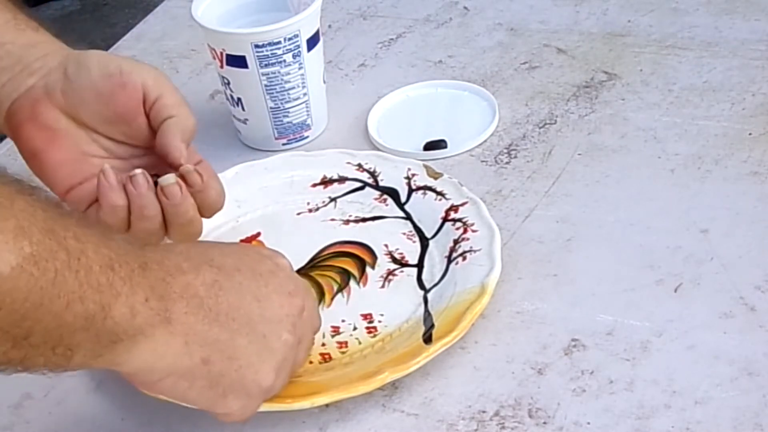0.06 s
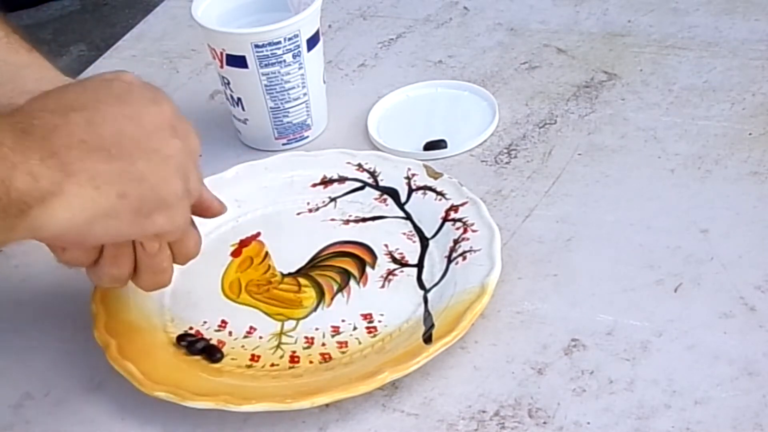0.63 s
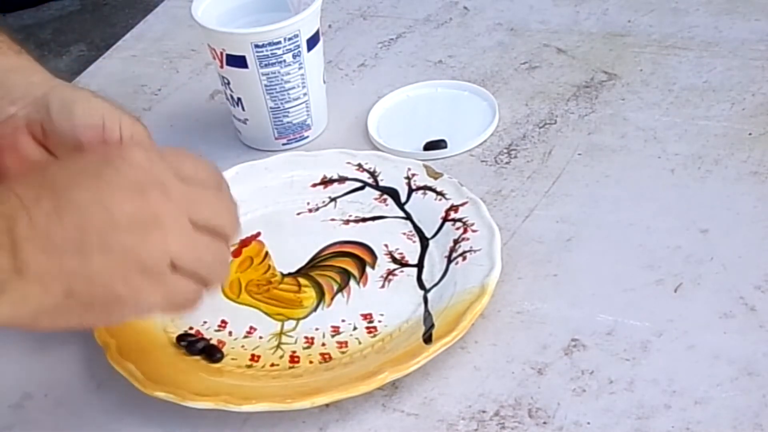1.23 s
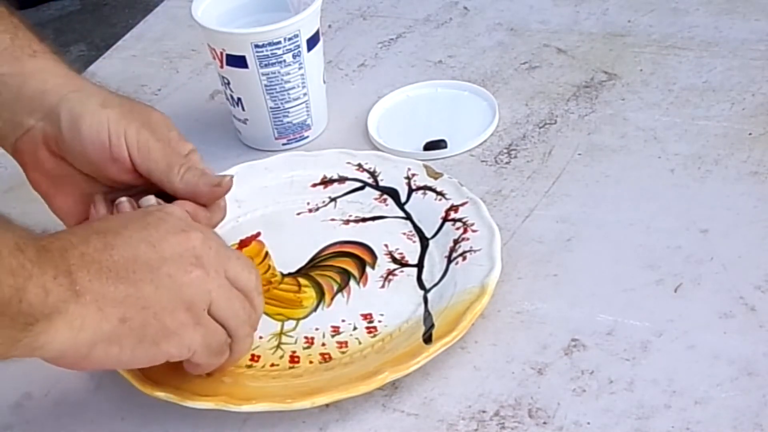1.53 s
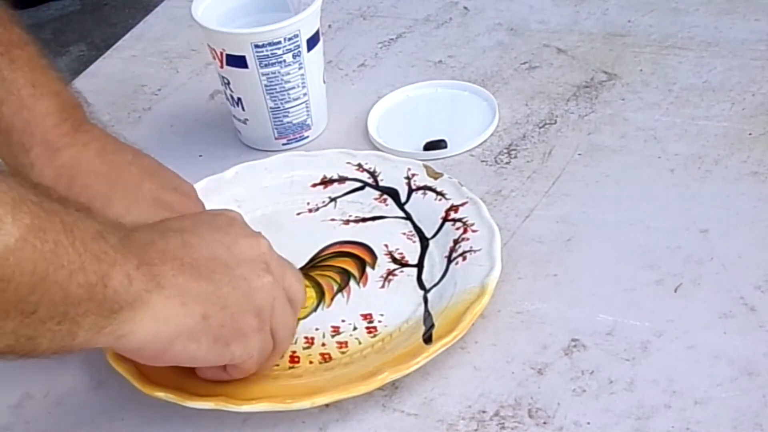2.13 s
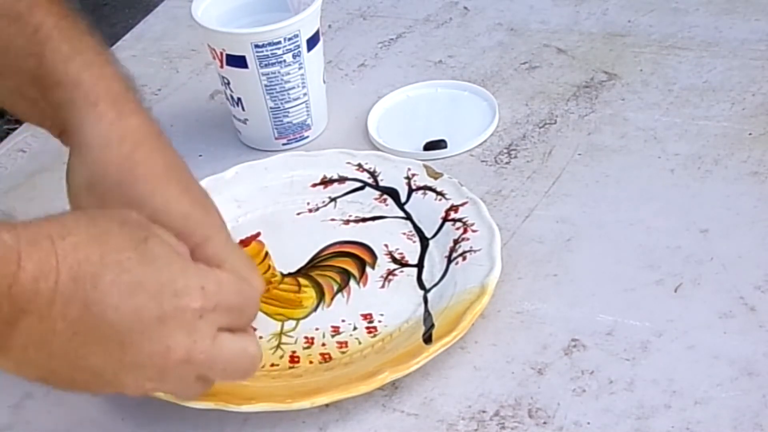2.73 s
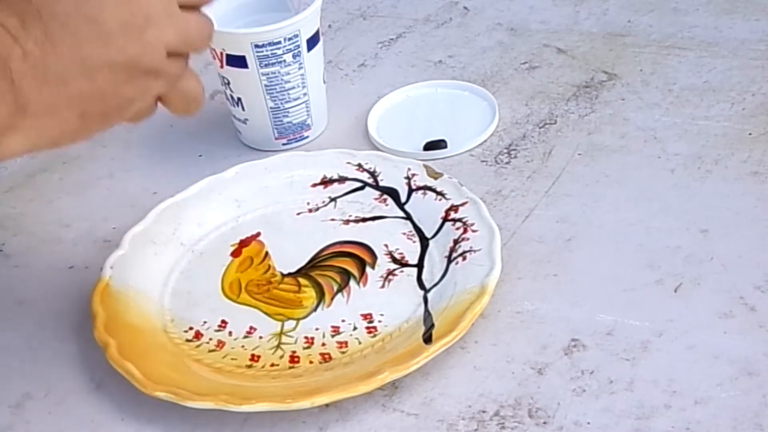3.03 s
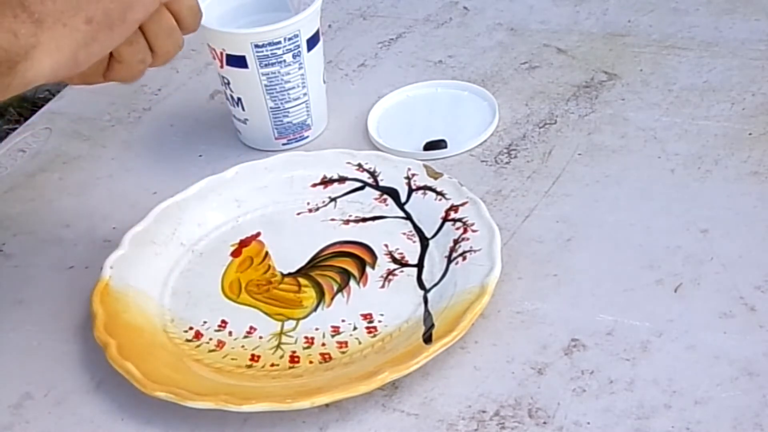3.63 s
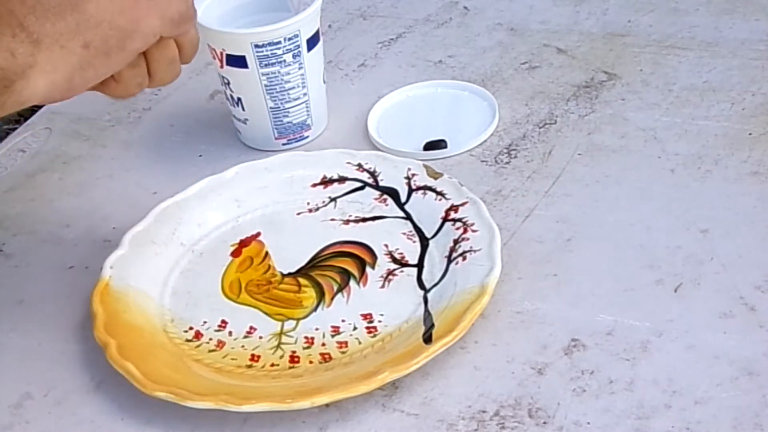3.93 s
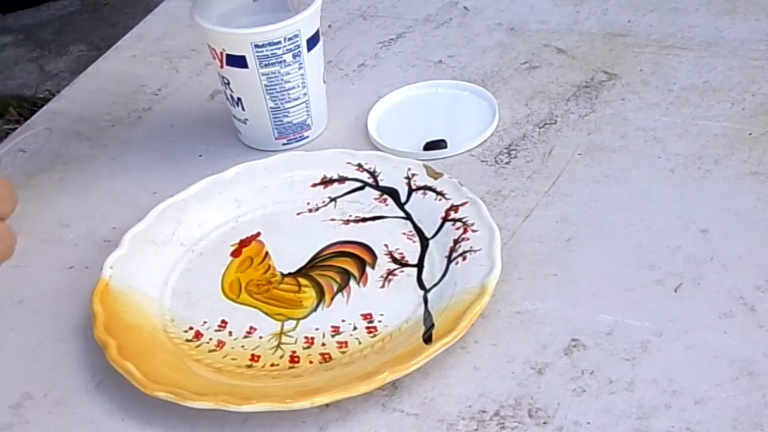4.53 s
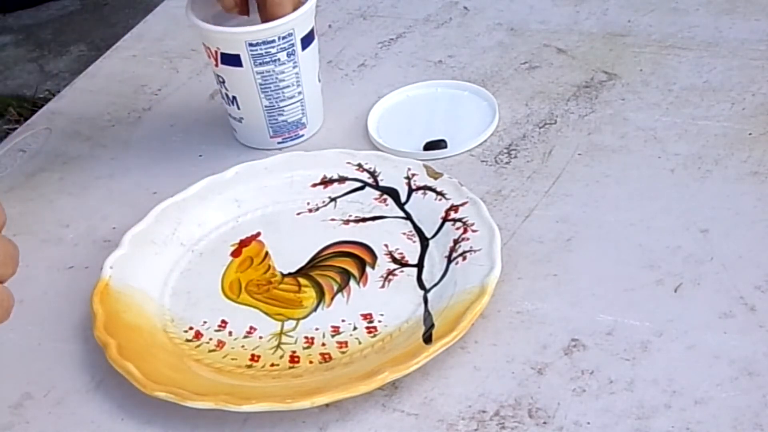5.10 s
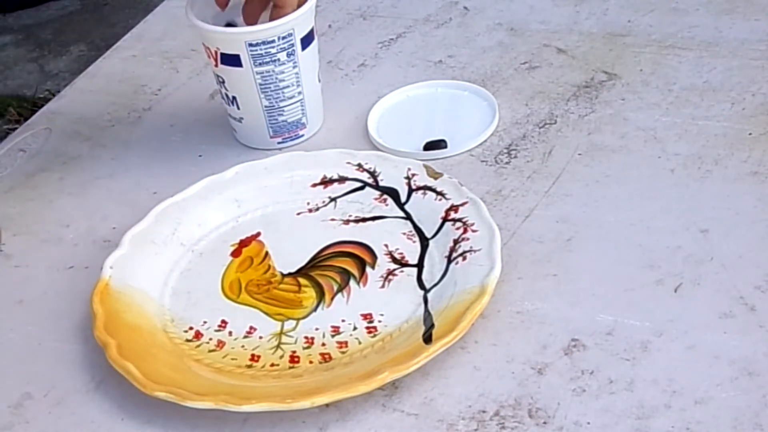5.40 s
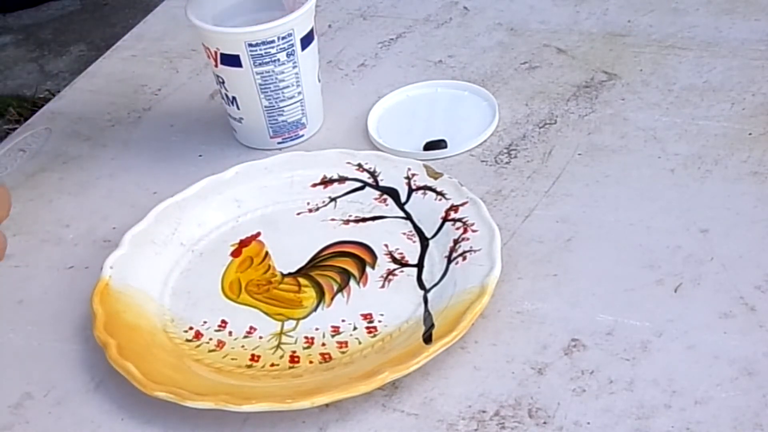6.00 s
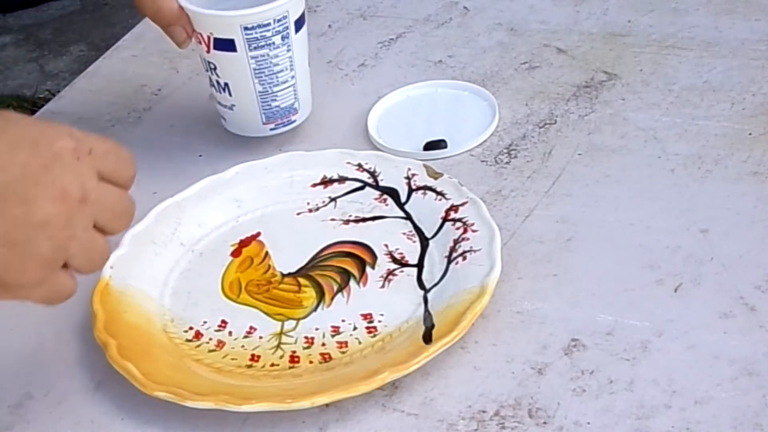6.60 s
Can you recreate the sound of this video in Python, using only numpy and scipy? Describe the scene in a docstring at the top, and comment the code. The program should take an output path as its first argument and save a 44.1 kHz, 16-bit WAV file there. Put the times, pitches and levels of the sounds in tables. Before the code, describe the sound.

Hard seeds are picked off a china plate with a few light clinks, ticking and rubbing together in the hand. Then a handful clatters loudly into a thin plastic tub, cracking against its wall and drumming on its base. A few more drop in, and the seeds shift faintly at the end. The microphone is close, outdoors, with a low murmur of far traffic.

```python
"""Seeds into a plastic tub

Hard seeds are picked off a china plate on an outdoor table: the plate clinks, seeds tick and rub in the hand.
A handful clatters into a thin tub, cracking on the plastic, ringing its wall and drumming its base; a few
more follow and the tub is taken hold of. Far traffic murmurs; the close microphone clips on the loudest blows."""
import sys
import numpy as np
from scipy import signal
from scipy.fft import rfft, irfft
from scipy.io import wavfile
from scipy.ndimage import uniform_filter1d

SR = 44100
rng = np.random.default_rng(int(sys.argv[2]) if len(sys.argv) > 2 else 0)


def materialize(psi):
    """Save the field psi as 16-bit PCM at rate SR to the path in sys.argv[1].

    A 1-D psi becomes a single channel; in a 2-D psi each row is a channel.
    """
    bounded = np.clip(np.atleast_2d(psi).T, -1, 1)
    quanta = np.round(bounded * 32767).astype(np.int16)
    wavfile.write(sys.argv[1], SR, quanta)


N = 297675
TIME_S = np.arange(N) / SR
EVENT_N = 8192
EVENT_S = np.arange(EVENT_N) / SR

# Table levels are relative.
# seeds landing or shifting in the tub: t/s, crack/dB, thump/dB, treble/dB
TUB_BLOWS = [(4.7231, -23.5, -38, -4), (4.7802, -9, -3, -11), (4.7852, -9.5, -4, -7),
             (4.7951, -8, -16, -13), (4.8155, -13.5, -17, -25), (4.8232, -13.5, -8, -13),
             (4.8322, -15, -6, -11), (4.8392, -10.5, -13, -19), (4.8472, -2.5, -4, -24),
             (4.8542, -9, -3.5, -11), (4.8712, -23, -7.5, -20), (4.8792, -23, -14, 2),
             (4.889, -10.5, -14, -10), (4.892, -11.5, -22, -18), (4.923, -14, -18, -15),
             (4.9312, -10, -6, -14), (4.9381, -4.5, -9, -13), (4.9422, -11.5, -7, -35),
             (4.9712, -16.5, -6, -32), (4.9942, -22, -29, -22), (5.033, -5.5, -17, -18),
             (5.0869, -21, -20.5, -23), (5.3431, -15.5, -23.5, -1), (5.4047, -11, -12, -1),
             (5.4096, -15, -17, -16), (5.4838, -7, -7.5, -8), (5.5002, -11.5, -20.5, -7),
             (5.505, -11.5, -13, -18), (5.5162, -14, -11, -17), (5.5342, -18.5, -17, -25),
             (5.5922, -31.5, -36, 0), (5.6192, -31.5, -30, -5), (6.2702, -32, -29, -35),
             (6.2842, -27.5, -27, -42), (6.3138, -28.5, -33, -32), (6.3665, -33, -50, -47)]
# tub base: f/pitch, level/dB, t60/s
BASE_MODES = [(0.281, -24, 0.13), (.48, -20.5, 0.058), (.73, -20, 0.045), (0.841, -6.5, 0.089),
              (1.003, 1, 0.084), (1.06, -16, .07), (1.35, -14.5, 0.092), (1.65, -22, 0.17)]
# tub wall: f/Hz, level/dB, t60/s
WALL_MODES = [(2090, 1, 0.078), (2152, 4, 0.094), (2310, -10, 0.093), (2410, 6, 0.061), (2520, -13, 0.16),
              (2614, 10.5, 0.089), (2920, 1, 0.17), (3050, -5, 0.14), (3097, 3, 0.099), (3490, -8, 0.094),
              (3952, 9, 0.07), (4430, -5, .08), (4500, -5, 0.099), (5600, -33, 0.061)]
# seed on plastic: f/Hz, level/dB
CRACK_SPECTRUM = [(80, -36), (200, -15.5), (500, -2), (950, 3.5), (1400, 1.5), (1780, -6), (2050, 1),
                  (2600, 4.5), (3200, 0), (4000, 3), (5000, -6), (5700, -2.5), (7500, -12), (8900, -10.5),
                  (10500, -25), (15500, -25.5)]
# dense wall modes: f/Hz, t60/s
SHIVER_DECAY = [(300, 0.15), (2500, 0.34), (6000, 0.2), (14000, 0.24)]
# seed on seed in the hand: t/s, level/dB, treble/dB
HAND_TICKS = [(0.624, -18.5, 12), (.655, -26, 1), (0.8433, -16, 2), (1.269, -31, -24), (1.755, -7, 0),
              (2.7327, -10, -8), (3.219, -25, -6), (3.228, -20, 6), (3.2927, -24.5, -1), (4.0048, -34, -5),
              (4.2159, -24.5, -9), (4.3061, -27, -26), (5.239, -33, 20)]
# seed on seed or glaze: f/Hz, level/dB
TICK_SPECTRUM = [(3000, 9), (4000, 5), (5300, 0), (7200, -2), (9200, -1.5), (11000, -19), (14000, -10.5),
                 (16000, -29)]
# seeds sliding in fingers or tub: centre t/s, 1/e half-width/s, level/dB
SEED_RUBS = [(3.32, .17, -57), (4.013, .012, -42), (4.32, 0.098, -54), (4.76, .025, -39.5),
             (6.305, .025, -44)]
# seed on plate: t/s, level/dB, treble/dB
PLATE_CLINKS = [(1.4368, -26, -16), (1.4644, -25.5, -18), (1.529, -22.5, 9), (1.55, -23.5, -2),
                (1.601, -26.5, -3), (1.655, -26.5, -4), (1.683, -17, -15), (1.88, -30, -7),
                (2.181, -25, -4), (2.205, -33, -6)]
# china plate: f/Hz, level/dB, t60/s
PLATE_MODES = [(1860, -19, 0.28), (2880, -2, 0.094), (2975, -3, 0.054), (3970, 0.5, 0.08), (4506, 2, 0.062),
               (5150, -15, 0.069), (5200, -10, 0.062), (6130, -13.5, 0.074), (7100, -19, 0.065),
               (9720, -30, .09)]
# hands on the table: t/s, f/Hz, level/dB
TABLE_BUMPS = [(0.054, 68, -24), (1.08, 145, -29.5), (2.78, 62, -34)]
# outdoor wash: f/Hz, level/dB
AIR_SPECTRUM = [(20, -20), (60, -9), (95, -1), (135, -1), (220, 1.5), (300, -4.5), (850, -4.5), (1500, -10),
                (2600, -8), (4800, -16), (7300, -28), (8800, -27), (10500, -42.5), (15500, -32)]
# outdoor wash: t/s, level/dB
AIR_ENVELOPE = [(0, -37.0), (1.1, -37), (2.1, -35.5), (3.6, -36), (4.4, -36.5), (6.0, -34.6), (6.75, -35)]
# steady background bands: f/Hz, width/Hz, level/dB
DRONE_BANDS = [(601.5, 36, -49), (777, 21, -54.5)]
# microphone port dips: f/Hz, width/Hz
PORT_NOTCHES = [(3680, 134), (4380, 327), (8040, 930), (11720, 520)]


def tub(contacts=3, hop_s=.0155, hop_crack_db=-14.5, hop_thump_db=-12):
    """Each seed lands and hops, weaker each time; the base's pitch rises as the tub fills."""
    empty_hz, full_hz, half_full_s, fill_s = 723.4, 753, 4.9, 0.061
    out = np.zeros(N)
    median_treble_db = np.median([row[-1] for row in TUB_BLOWS])
    for s, crack_db, thump_db, treble_db in TUB_BLOWS:
        bright_db = 0.71 * (treble_db - median_treble_db)  # harder contacts are brighter
        filled = .5 + .5 * np.tanh((s - half_full_s) / fill_s)
        pitch_hz = empty_hz + filled * (full_hz - empty_hz)
        for hop in range(contacts):
            hz = pitch_hz * (1 + .025 * rng.standard_normal())
            blow = landing(crack_db + hop * hop_crack_db, thump_db + hop * hop_thump_db, bright_db, hz)
            add(out, s, blow)
            s += hop_s * (1 + .06 * rng.standard_normal())
    return out


def landing(crack_db, thump_db, bright_db, base_hz):
    """One blow cracks on the plastic, rings the wall and drums the base."""
    crack = snap(CRACK_SPECTRUM, 160, bright_db, chatter_s=0.0049, roughness=1.4, lag_s=.0024)
    # the shifting load detunes the thin wall
    detuned = [(hz * (1 + 0.012 * rng.standard_normal()), db, t60) for hz, db, t60 in WALL_MODES]
    wall = ring(detuned, scatter_db=7) * attack(0.0033)
    tail = amp(15) * shiver(bright_db - 8) + amp(-23) * wall + amp(13) * rattle(bright_db - 21)
    out = amp(crack_db) * (amp(22) * crack + tail)
    base = ring([(ratio * base_hz, db, t60) for ratio, db, t60 in BASE_MODES], scatter_db=4)
    swing_up = 1 - np.exp(-(EVENT_S / 0.0033) ** 2)
    add(out, 0.00198, amp(thump_db + 0.24) * base * swing_up)
    return out


def snap(spectrum, low_cut_hz, treble_db, chatter_s, roughness, lag_s):
    """Hard contact with brief chatter; bending waves bring the treble first. Unit energy."""
    hz = np.fft.rfftfreq(EVENT_N, 1 / SR)
    force = 1 + roughness * rfft(chatter(chatter_s))
    low_cut = 1 / np.sqrt(1 + (low_cut_hz / (hz + 1)) ** 14)
    gain = amp(at_hz(spectrum, hz) + treble_db * shelf(hz)) * low_cut
    delay_s = lag_s * np.sqrt(3000 / (hz + 300))
    phase = -2 * np.pi * np.cumsum(delay_s) * hz[1]
    click = irfft(force * gain * np.exp(1j * phase))
    click *= np.cos(np.pi / 2 * EVENT_S / EVENT_S[-1])
    return click / np.linalg.norm(click)


def chatter(length_s):
    """Rough, fading force of a skittering seed. Unit energy."""
    force = rng.choice([-1., 1.], EVENT_N) * np.exp(-(EVENT_S / length_s) ** 2)
    return force / np.linalg.norm(force)


def shiver(treble_db):
    """Dense, weak wall modes, each band decaying at its own rate. Unit energy."""
    hz, t, noise = signal.stft(rng.standard_normal(EVENT_N), SR, nperseg=128)
    colour_db = at_hz(CRACK_SPECTRUM, hz) + treble_db * shelf(hz)
    decay_db = 60 * t / at_hz(SHIVER_DECAY, hz)[:, None]
    tail = signal.istft(noise * amp(colour_db[:, None] - decay_db), SR, nperseg=128)[1][:EVENT_N]
    tail *= attack(0.00064)
    return tail / np.linalg.norm(tail)


def rattle(treble_db, spread_s=.018, count=4):
    """Jostled seeds rebound in the tub, weaker when later."""
    out = np.zeros(EVENT_N)
    for late, weak in rng.random((count, 2)):
        rebound = snap(CRACK_SPECTRUM, 450, treble_db, chatter_s=0.0008, roughness=1.1, lag_s=.0026)
        add(out, 0.001657 + late * spread_s, amp(-9 * late - 8.3 * weak) * rebound)
    return out


def hand_ticks(firm_db=-18.5, db_per_octave=6):
    """Seed snaps on seed, with faint scatter off the table; firmer ticks reach lower."""
    out = np.zeros(N)
    for s, db, treble_db in HAND_TICKS:
        low_cut_hz = np.clip(5400 / 2 ** ((db - firm_db) / db_per_octave), 2780, 5400)
        tick = snap(TICK_SPECTRUM, low_cut_hz, treble_db, chatter_s=0.0026, roughness=2.7, lag_s=0.0019)
        scatter = rng.standard_normal(EVENT_N) * amp(-39 - 60 * EVENT_S / 0.14)
        add(out, s, amp(db + 9) * (tick + signal.fftconvolve(tick, scatter)[:EVENT_N]))
    return out


def plate(skid_s=.0062):
    """Seeds knock and skid on the glaze; the hand damps the china's ring."""
    out = np.zeros(N)
    for s, db, treble_db in PLATE_CLINKS:
        modes = [(hz, mode_db + treble_db * shelf(hz), t60) for hz, mode_db, t60 in PLATE_MODES]
        china = ring(modes, scatter_db=2.5)
        knock = china * attack(0.00083)
        skid = signal.fftconvolve(chatter(skid_s), china)[:EVENT_N]
        scrape = snap(TICK_SPECTRUM, 2800, treble_db - 17, chatter_s=2 * skid_s, roughness=4, lag_s=.003)
        add(out, s, amp(db) * (amp(-7) * knock + amp(-11) * skid + amp(13) * scrape))
    return out


def rubbing(slips_per_s=500):
    """Sliding seeds: a sparse stream of tiny slips, each rub swelling and fading."""
    slips = (rng.random(N) < slips_per_s / SR) * rng.standard_normal(N)
    slips *= amp(3.4 * np.minimum(rng.exponential(1, N), 3))  # a few stand out
    grain = snap(TICK_SPECTRUM, 4600, -6, chatter_s=0.00033, roughness=0.16, lag_s=.002)
    swells = sum(amp(db) * np.exp(-((TIME_S - s) / half_s) ** 2) for s, half_s, db in SEED_RUBS)
    return unit_rms(signal.oaconvolve(slips, grain)[:N]) * swells


def table_thuds(t60_s=.17):
    """The table top thuds softly as hands lean on it."""
    out = np.zeros(N)
    for s, hz, db in TABLE_BUMPS:
        add(out, s, ring([(hz, db, t60_s)], scatter_db=2) * attack(0.0095))
    return out


def outdoors():
    """Distant wash with drifting spectral patches, plus faint steady drones."""
    hz, _, noise = signal.stft(rng.standard_normal(N), SR, nperseg=2048)
    patches = uniform_filter1d(rng.standard_normal(noise.shape), size=16, axis=0)
    patches_db = 0.95 * unit_rms(uniform_filter1d(patches, size=6, axis=1))
    gain = amp(at_hz(AIR_SPECTRUM, hz)[:, None] + patches_db)
    wash = unit_rms(signal.istft(noise * gain, SR, nperseg=2048)[1][:N])
    wash *= amp(np.interp(TIME_S, *np.transpose(AIR_ENVELOPE)))
    return wash + sum(amp(db) * noise_band(f, width_hz) for f, width_hz, db in DRONE_BANDS)


def traffic():
    """Low drone of far traffic, swelling and fading."""
    return passing(nearest_s=2.43, half_s=1.93, peak_db=-45) * noise_band(hz=134.7, width_hz=31)


def motor(nearest_s=3.72, nearest_hz=196.2, rise_hz_per_s=14.2):
    """A far motor passes, gathering speed evenly; pitch and level waver."""
    hz = nearest_hz + rise_hz_per_s * (TIME_S - nearest_s)
    hz *= 1 + 0.0029 * noise_band(0, width_hz=4.8)
    tone = unit_rms(np.sin(2 * np.pi * np.cumsum(hz) / SR))
    flutter = amp(noise_band(0, width_hz=29))
    return passing(nearest_s, half_s=.8, peak_db=-41) * flutter * tone


def passing(nearest_s, half_s, peak_db):
    """Gain of a passing vehicle, halved at nearest_s +/- half_s."""
    return amp(peak_db) / (1 + ((TIME_S - nearest_s) / half_s) ** 2)


def noise_band(hz, width_hz):
    """Narrow noise around hz. Unit rms."""
    pole = np.exp(-np.pi * width_hz / SR)
    noise = rng.standard_normal(N) + 1j * rng.standard_normal(N)
    drift = signal.lfilter([1], np.poly([pole, pole]), noise)
    return unit_rms((drift * np.exp(2j * np.pi * hz * TIME_S)).real)


def ring(modes, scatter_db):
    """Decaying sines; each blow lands elsewhere and weights them anew."""
    return sum(amp(db + scatter_db * rng.standard_normal() - 60 * EVENT_S / t60)
               * np.sin(2 * np.pi * hz * EVENT_S) for hz, db, t60 in modes)


def attack(rise_s):
    """Exponential onset."""
    return 1 - np.exp(-EVENT_S / rise_s)


def shelf(hz):
    """Treble shelf weight, 0 to 1."""
    return 1 / (1 + (7000 / (hz + 1)) ** 4)


def at_hz(points, hz):
    """Table lookup on a log-frequency axis."""
    f, value = np.transpose(points)
    return np.interp(np.log(hz + 1), np.log(f + 1), value)


def amp(db):
    """dB to gain."""
    return 10 ** (np.asarray(db) / 20)


def unit_rms(x):
    """Scale to rms 1."""
    return x / np.sqrt(np.mean(x ** 2) + 1e-20)


def add(mix, s, sound):
    """Mix in at time s."""
    part = mix[round(s * SR):][:len(sound)]
    part += sound[:len(part)]


def scene():
    """All sources, mono."""
    seeds = tub() + hand_ticks() + rubbing() + plate()
    return (seeds + table_thuds() + outdoors() + traffic() + motor())[None]


def record(dry):
    """Microphone: port notches, clipping, band limit."""
    for hz, width_hz in PORT_NOTCHES:
        dry = signal.lfilter(*signal.iirnotch(hz, hz / width_hz, SR), dry)
    clipped = np.clip(dry, -1, 1)
    low_pass = signal.firwin(401, cutoff=15900, window=("kaiser", 8), fs=SR)
    return signal.oaconvolve(clipped, low_pass[None], "same")


dry = scene()
out = record(dry)
materialize(out)
```